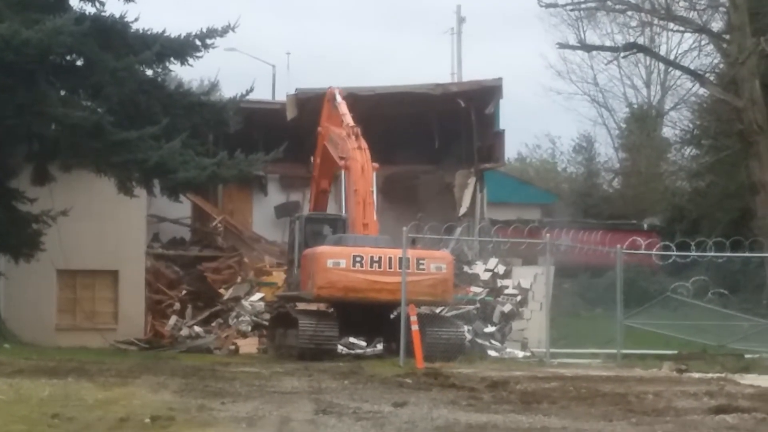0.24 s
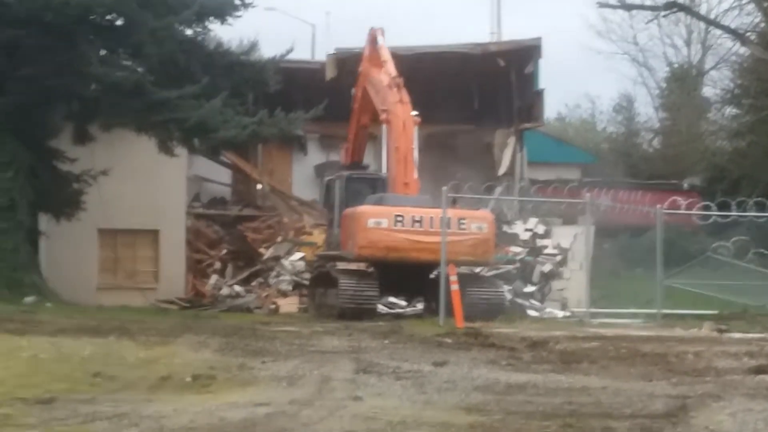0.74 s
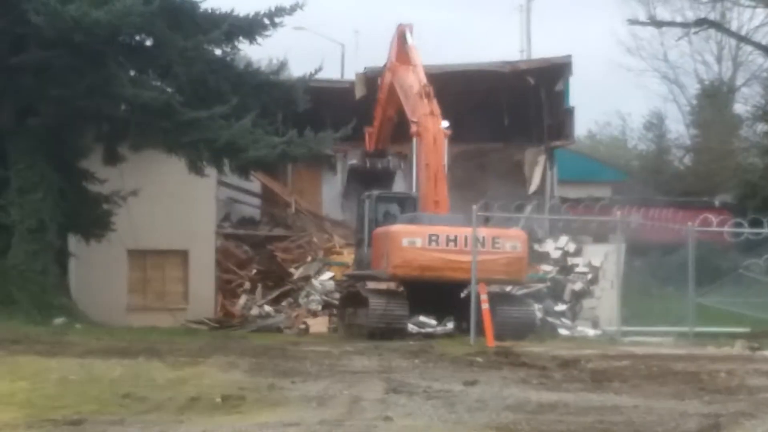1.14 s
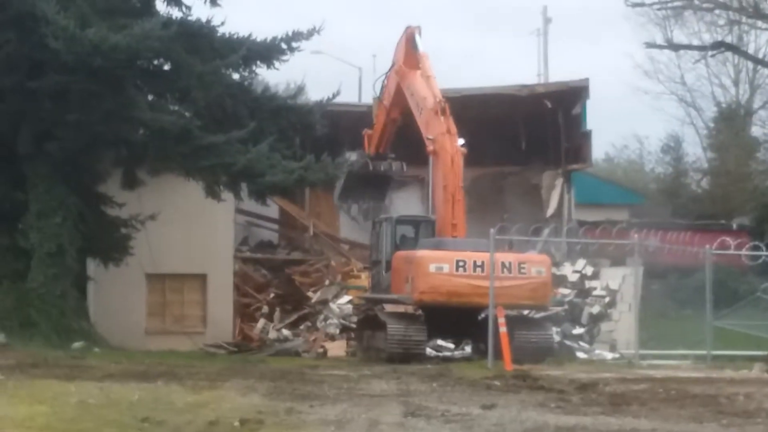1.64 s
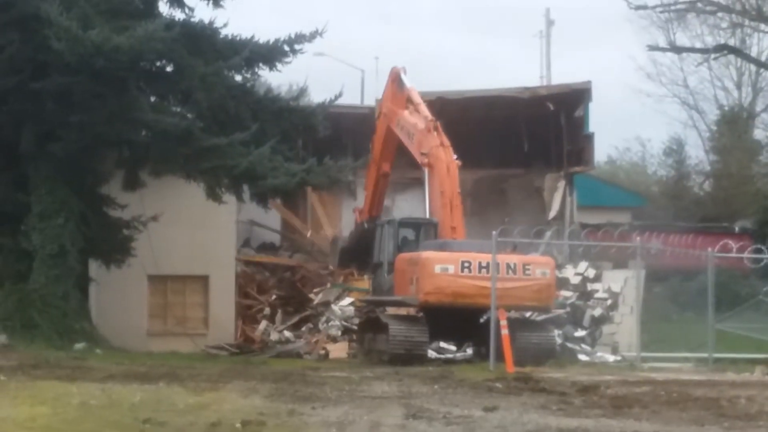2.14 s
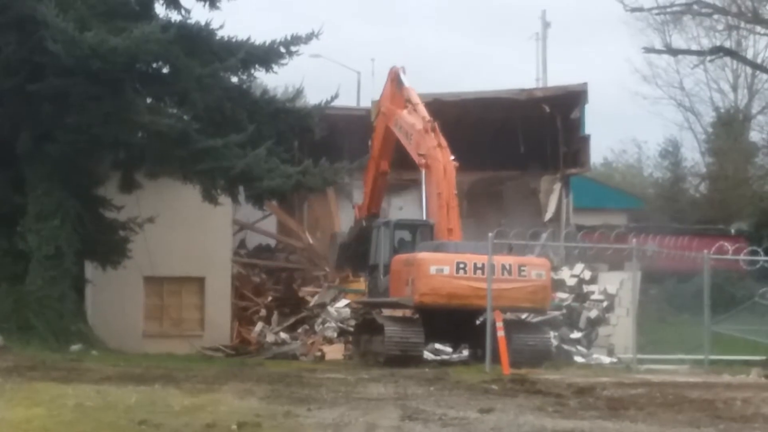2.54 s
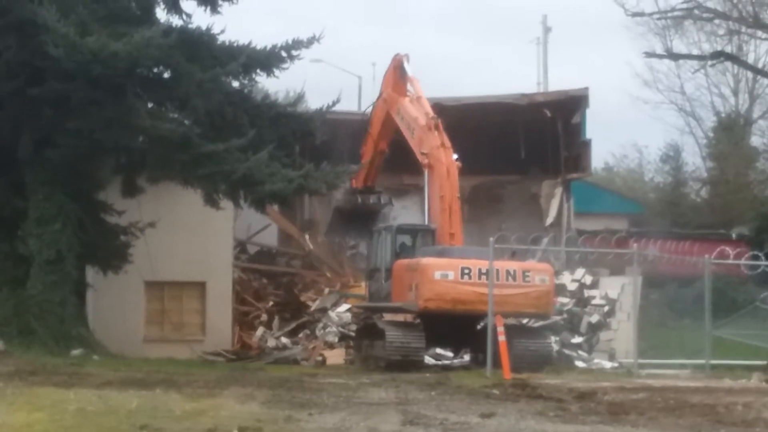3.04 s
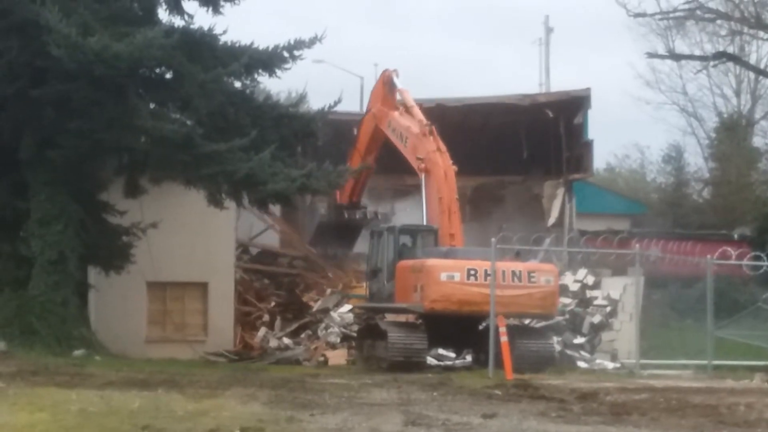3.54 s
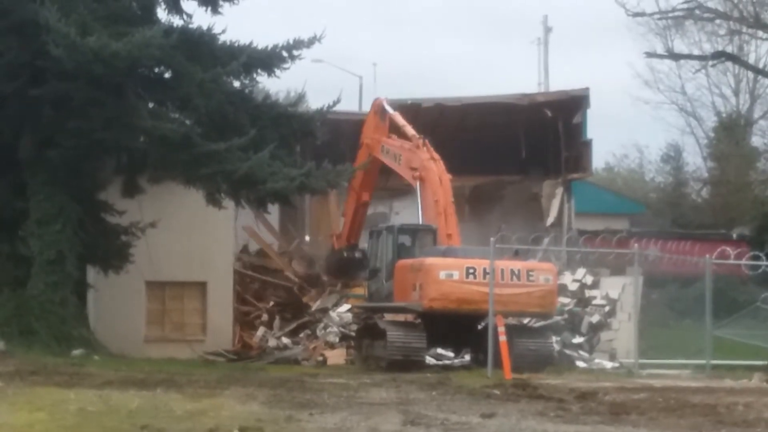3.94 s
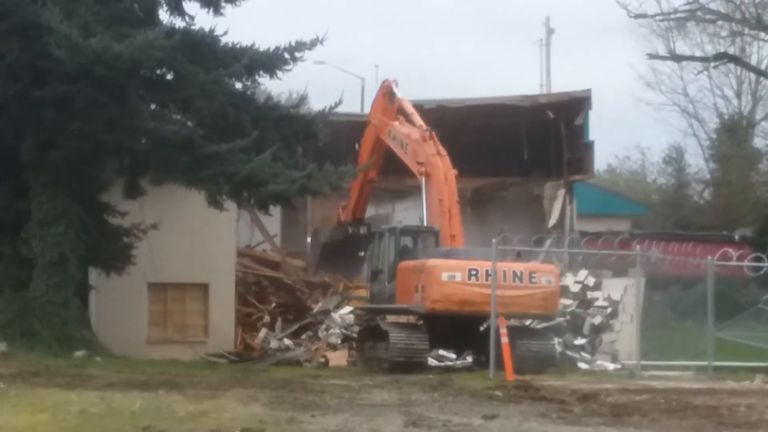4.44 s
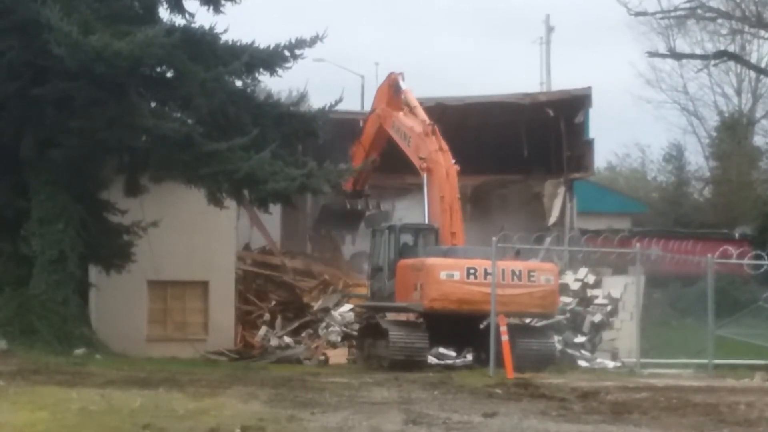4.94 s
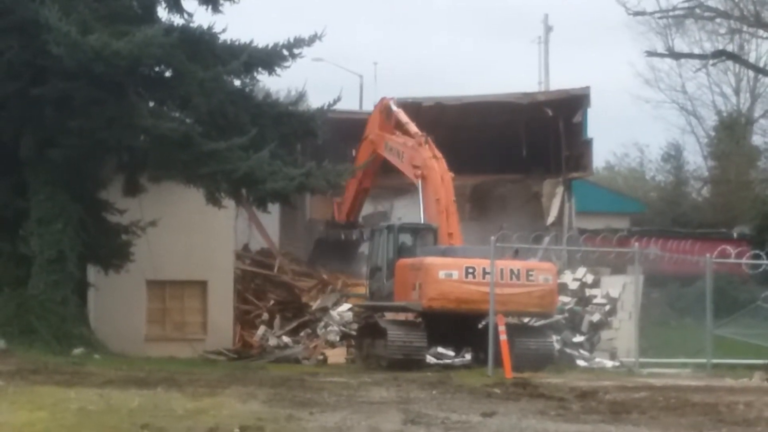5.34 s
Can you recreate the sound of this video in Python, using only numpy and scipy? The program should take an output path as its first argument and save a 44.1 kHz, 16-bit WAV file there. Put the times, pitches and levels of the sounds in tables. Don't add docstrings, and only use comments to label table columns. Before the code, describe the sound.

Demolition across a yard: sliding broken boards, a quiet engine lull, then two big splintering wood crashes and a final one cut short.

```python
import sys
import numpy as np
from scipy import signal
from scipy.fft import rfft, irfft, next_fast_len
from scipy.io import wavfile
from scipy.ndimage import uniform_filter1d, map_coordinates

SR = 44100
rng = np.random.default_rng(int(sys.argv[2]) if len(sys.argv) > 2 else 0)


def invert_db(level):
    return 10 ** (np.asarray(level, dtype=float) / 20)


def dump_mix(stems):
    frames = np.atleast_2d(stems).T
    limited = np.clip(frames, -1, 1)
    pcm = np.round(limited * 32767).astype(np.int16)
    wavfile.write(sys.argv[1], SR, pcm)


N = 246959

# (time [s], level [dB], build-up [s], hold [s], fade [s])
HEAP_SLIDES = [(0, -14.5, .01, 0.014, 0.25), (.4, -33, 0.095, .02, 1.05), (1.3, -33, 0.38, 0.88, 0.53),
               (1.73, -21, 0.051, 0.053, 0.068), (2.01, -12, 0.016, 0.0052, 0.063),
               (2.045, -9, .01, .01, .04), (2.075, -7.5, 0.025, 0.11, 0.21),
               (2.31, -16, 0.21, 0.0047, 0.067), (2.38, -51, 0.065, .05, .2),
               (2.56, -27.5, 0.24, 0.17, 0.52), (2.95, -36.5, 0.52, 0.22, 0.071),
               (3.41, -27.5, 0.26, 0.024, 0.13), (3.74, -14.5, 0.33, 0.0086, 0.056),
               (3.835, -12, 0.086, 0.25, 0.16), (3.79, -18, 0.11, 0.017, .1),
               (4.25, -27.5, 0.036, 0.28, 2.4), (5.13, -22.5, 0.17, 0.06, 0.32),
               (5.19, -20.5, 0.045, 0.025, 0.097), (2.472, -27, 0.011, 0.036, 0.44),
               (5.54, -11, 0.36, 0.025, 0.28)]
# (time [s], level [dB], build-up [s], hold [s], fade [s])
FIBRE_TEARS = [
    (0, -18.5, .01, 0.0035, 0.21),
    (1.79, -39, 0.059, 0.11, 0.17),
    (2.05, -29.5, 0.072, 0.034, .03),
    (2.073, -19.5, 0.0036, 0.15, 0.26),
    (2.3, -31.5, 0.13, 0.051, 0.27),
    (3.75, -50, 0.66, .02, 0.23),
    (3.835, -19.5, 0.1, 0.13, 0.34),
    (5.42, -31, 0.15, .02, 0.37),
    (5.55, -26, 0.13, 0.0034, 0.13),
]
# (frequency [Hz], gain [dB])
FAR_YARD = [(7500, 0), (8500, -13.5), (10000, -14), (12000, -12.5), (15000, -17)]


def unit(x):
    return x / np.sqrt(np.mean(x ** 2) + 1e-20)


def along(points, hz):
    f, v = np.transpose(points)
    return np.interp(np.log(hz + 1), np.log(f + 1), v)


def curves(rows):
    s, *cols = np.transpose(rows)
    return [np.interp(np.arange(N) / SR, s, c) for c in cols]


def wobble(rate):
    knots = rng.standard_normal(int(N * 200 / SR) + 4)
    return map_coordinates(knots, [np.arange(N) * rate / SR])


def filtered(x, spectrum):
    m = next_fast_len(N + 8192)
    gain = invert_db(along(spectrum, np.fft.rfftfreq(m, 1 / SR)))
    return irfft(rfft(x, m) * gain, m)[:N]


def coloured(x, spectrum):
    return unit(filtered(x, spectrum))


def power_sum(*levels_db):
    power = sum(10 ** (np.asarray(db) / 10) for db in levels_db)
    return 10 * np.log10(power + 1e-14)


def swells(rows):
    step_db = 20
    t = np.arange(N) / SR

    def slope(s, span):
        return step_db * np.clip(s, 0, None) / max(span, 1e-3)

    return power_sum(*(db - slope(s - t, build) - slope(t - s - hold, fade)
                       for s, db, build, hold, fade in rows))


def contacts(count, spread_db, life, wash):
    when, size = rng.random((count, 2)).T
    strength = np.bincount((when * N).astype(int), invert_db(-spread_db * np.log(size + .01)), N)
    envelope = signal.lfilter([1], [1, -np.exp(-1 / (life * SR))], strength)
    return (unit(envelope) + wash) * rng.standard_normal(N)


def clatter(count, low_hz, high_hz, cycles, spread_db, size):
    when, pitch, strength = rng.random((count, 3)).T[..., None]
    hz = low_hz + (high_hz - low_hz) * pitch
    k = np.arange(size)
    rings = invert_db(-spread_db * np.log(strength + .03)) * np.sqrt(hz) * np.exp(-k * hz / (cycles * SR))
    rings = rings * np.sin(2 * np.pi * hz * k / SR) * (1 - k / size)
    return np.bincount(((when * N).astype(int) + k).ravel(), rings.ravel(), N + size)[:N]


def burst(hz, width_hz, t60, size=SR // 4):
    t = np.arange(size) / SR
    b, a = signal.iirpeak(hz, hz / width_hz, SR)
    noise = rng.standard_normal(size) * invert_db(-60 * t / t60)
    out = signal.lfilter(b, a, signal.lfilter(b, a, noise))
    return out / np.abs(out).max()


def ring(hz, t60, rough, width_hz, size=SR // 4):
    t = np.arange(size) / SR
    tone = invert_db(-60 * t / t60) * np.sin(2 * np.pi * hz * t)
    return (1 - np.exp(-t * hz / 1.6)) * (tone + rough * burst(hz, width_hz, 1.3 * t60))


def onset(rise_s, size=SR // 4):
    return 1 - np.exp(-np.arange(size) / SR / rise_s)


def add(track, s, sound):
    part = track[round(s * SR):][:len(sound)]
    part += sound[:len(part)]


def engine():
    # (time [s], load as exhaust hum [dB])
    load = [(0, -29), (.3, -33), (1.05, -32), (1.15, -25), (1.35, -23.5), (1.5, -26.5), (1.68, -22.5),
            (1.8, -28.5), (2.1, -29), (2.5, -29), (2.9, -26.5), (3.35, -26), (4.3, -24), (4.75, -25),
            (5.05, -27), (5.6, -22)]
    # (time [s], level [dB])
    spool = [(0, -56), (1.05, -56), (1.15, -49.5), (1.5, -51), (2.5, -57.5), (5.6, -52)]
    # (crankshaft order [-], level [dB], phase unrest [rad])
    orders = [(2, -10.5, 2.5), (3, -13.5, 0.47), (4, -7.5, 0.75), (5, 3, 0.44), (6, -4.5, 0.61),
              (7, -15, 1), (9, -48, .4)]
    # (frequency [Hz], density [dB per Hz])
    block_spectrum = [(120, -13.5), (230, -2), (323, -13.5), (400, -10), (541, -15), (700, -13),
                      (1000, -15.5), (1500, -13), (1950, -17), (2300, -20), (3000, -22), (3600, -23),
                      (4100, -34.5), (5700, -33.5), (9000, -120)]
    # (frequency [Hz], density [dB per Hz])
    turbo_spectrum = [(3000, -25), (4200, -34), (5700, 1.5), (6400, 1), (7100, 4), (7700, -1.5),
                      (8500, -20), (10000, -22), (12000, -16), (15500, -30)]
    shaft_hz = 35.1
    load_db, = curves(load)
    hiss_db, = curves(spool)
    turn = 2 * np.pi * shaft_hz * np.arange(N) / SR + .06 * wobble(2)
    hum = np.zeros(N)
    for k, db, unrest in orders:
        level = invert_db(db + (1 + 1.6 * unrest) * wobble(7))
        hum += level * np.cos(k * turn + unrest * wobble(5))
    firing = 1 + 0.11 * np.cos(3 * turn)
    block = coloured(firing * contacts(count=5000, spread_db=2.5, life=0.01, wash=2.4), block_spectrum)
    hiss = coloured(firing * rng.standard_normal(N), turbo_spectrum)
    clatter_db = -32 + 0.94 * (load_db + 27)
    return invert_db(load_db) * hum + invert_db(clatter_db) * block + invert_db(hiss_db - 2.5) * hiss


def plank_level():
    planks_db, planks_top_db = 2.5, -13.5
    yield_db_per_db = .6
    ripping_db = np.clip(swells(FIBRE_TEARS) + 34, 0, None)
    held_db = -power_sum(-swells(HEAP_SLIDES) - planks_db, -planks_top_db)
    return held_db - yield_db_per_db * ripping_db


def ground():
    # (time [s], effort [dB])
    drag = [(0, -28), (.2, -32), (.85, -34), (1.06, -46), (1.23, -31.5), (1.6, -27), (1.8, -19.5),
            (2.05, -24.5), (2.2, -22.5), (2.8, -29.5), (3.4, -26), (3.7, -22), (4.5, -22.5), (5, -23.5),
            (5.4, -17), (5.47, -11), (5.53, -15), (5.6, -14.5)]
    # (frequency [Hz], density [dB per Hz])
    earth_spectrum = [(24, -49), (40, -18), (57, -11), (72, -6.5), (90, -7), (139, -1), (175, -4.5),
                      (230, -37), (390, -120)]
    # (frequency [Hz], density [dB per Hz])
    beam_spectrum = [(110, -35), (180, -3), (270, -13), (370, -16), (520, -35), (880, -120)]
    # (time [s], peak level [dB], ring [Hz], t60 [s])
    thuds = [(0.032, -9, 204, 0.067), (0.17, -14, 176, 0.11), (1.721, -10, 134, 0.08),
             (1.735, -7.5, 142.6, 0.2), (1.826, -8, 168.3, 0.23), (2.044, -3, 188, 0.075),
             (2.279, -12, 162, 0.054), (2.561, -8, 173.4, 0.19), (3.623, 3.5, 173, 0.052),
             (3.671, -4.5, 163, 0.088), (3.986, -14, 171, 0.17), (4.536, -4, 177, 0.18),
             (4.657, -3, 173.6, 0.14), (4.717, -9, 162.6, 0.41), (5.007, -12, 194, 0.17),
             (5.141, -3, 147, 0.15), (5.27, -6.5, 139.5, 0.27), (5.34, -13, 148, 0.32),
             (5.382, -22, 157, 0.07), (5.463, 5, 145, 0.073), (5.568, -1.5, 119.3, 0.17)]
    beam_ring_db, heap_shakes_db = -5, -6.5
    effort_db, = curves(drag)
    lumps = .8 * wobble(16)
    out = invert_db(effort_db - 1.5 + lumps) * coloured(rng.standard_normal(N), earth_spectrum)
    beams_db = power_sum(effort_db + beam_ring_db, plank_level() + heap_shakes_db)
    out += invert_db(beams_db + 1.4 * lumps) * coloured(rng.standard_normal(N), beam_spectrum)
    t = np.arange(SR // 3) / SR
    for s, db, hz, t60 in thuds:
        decay = invert_db(db - 1.5 - 60 * t / t60)
        add(out, s, decay * onset(0.0046, SR // 3) * np.sin(2 * np.pi * hz * t))
    return out


def debris():
    # (frequency [Hz], density [dB per Hz])
    slat_spectrum = [(800, -18), (1050, -11.5), (1380, 3.5), (1630, -1.5), (1890, 3.5), (2300, -2.5),
                     (2700, -11), (3300, -42.5), (3900, -34), (5000, -75), (8000, -120)]
    # (frequency [Hz], density [dB per Hz])
    plank_spectrum = [(200, -59), (350, -38.5), (430, -19), (520, -6.5), (634, -6), (746, -9.5),
                      (900, -7.5), (1150, -11.5), (1500, -15), (2500, -120)]
    # (frequency [Hz], density [dB per Hz])
    splinter_spectrum = [(1650, 5.5), (2800, 6.5), (3390, 2), (4720, -2.5), (5860, -7), (7510, -17),
                         (8280, -48), (9000, -31.5), (11700, -54), (19800, -120)]
    # (frequency [Hz], density [dB per Hz])
    dust_spectrum = [(4710, -10.5), (8000, -3), (8870, -15), (11800, -9.5), (12900, -15.5), (14000, -11),
                     (15600, -19)]
    heap_db, tear_db = swells(HEAP_SLIDES), swells(FIBRE_TEARS)
    crumbs_db = -44 + 0.63 * (heap_db + 30.5)
    splinter_db = power_sum(tear_db, crumbs_db)
    dust_db = -52 + 1.4 * (splinter_db + 21)
    tumble = wobble(28)
    heavy = np.clip((heap_db + 41) / 22, 0, .7)

    def mixed(rings, body):
        wash = coloured(rng.standard_normal(N), body)
        return heavy * coloured(rings, body) + np.sqrt(1 - heavy ** 2) * wash

    slats = clatter(count=5000, low_hz=912, high_hz=3330, cycles=4.0, spread_db=2.5, size=600)
    planks = clatter(count=1400, low_hz=401, high_hz=1367, cycles=4.2, spread_db=3.5, size=1400)
    crackle = contacts(count=3500, spread_db=8.5, life=0.0065, wash=3.0)
    out = invert_db(heap_db - 5 + 1.7 * tumble) * mixed(slats, slat_spectrum)
    out += invert_db(plank_level() - 4 + 0.13 * tumble) * mixed(planks, plank_spectrum)
    out += invert_db(splinter_db + 2.5 + 0.39 * tumble) * coloured(crackle, splinter_spectrum)
    return out + invert_db(dust_db + 10.5 + 0.62 * tumble) * coloured(crackle, dust_spectrum)


def thin_boards():
    # (time [s], peak level [dB], ring [Hz], t60 [s])
    landings = [(.003, -3.5, 1785, 0.073), (.012, -3.5, 2360, 0.034), (.03, -5.5, 1500, 0.043),
                (.052, -11, 2070, 0.061), (0.083, -10, 1450, 0.045), (0.105, -7, 1825, 0.046),
                (0.125, -16, 1610, 0.064), (1.737, -8.5, 1813, 0.18), (2.15, -17, 1670, 0.055),
                (2.183, -12, 1940, .06), (2.241, -3.5, 1930, 0.063), (2.317, 0, 1324, 0.067),
                (2.473, -7.5, 1910, 0.019), (3.6, -11, 2004, 0.091), (3.833, -16, 1880, .08),
                (3.905, -3.5, 1450, 0.068), (3.965, -3, 1850, 0.067), (5.547, -5.5, 1920, 0.051),
                (0.168, -11, 1960, 0.029), (0.418, -26, 1880, 0.14), (1.597, -18, 2270, 0.088),
                (1.698, -16, 1140, 0.062), (1.727, -1.5, 1287, 0.056), (1.762, -11, 1690, 0.1),
                (1.799, -20, 1730, 0.065), (1.829, -41.5, 1530, 0.058), (2.011, -20, 1770, .09),
                (2.041, -4, 1320, 0.11), (2.089, -5, 1860, 0.16), (2.124, -10, 1880, 0.2),
                (2.287, -7, 1774, 0.17), (2.474, -9.5, 1300, 0.021), (2.524, -8.5, 1440, 0.057),
                (3.108, -16, 1290, 0.06), (3.333, -16, 2340, 0.03), (3.568, -14, 1430, 0.073),
                (3.677, -7, 1334, 0.13), (3.73, -4, 1330, 0.05), (3.86, -7, 1850, 0.1),
                (4.052, 0, 1994, 0.037), (4.445, -8, 1830, 0.021), (4.79, -22, 2180, 0.049),
                (5.112, -12, 1750, 0.14), (5.193, -7, 1100, 0.16), (5.31, -16, 1450, 0.067),
                (5.361, -9, 1150, 0.083), (5.425, -2, 1810, 0.08), (5.495, -10, 1890, 0.29)]
    out = np.zeros(N)
    for s, db, hz, t60 in landings:
        board = invert_db(-8.5) * ring(hz, 1.05 * t60, rough=1.62, width_hz=380)
        slap = 0.57 * burst(1510, width_hz=750, t60=0.36 * t60)
        add(out, s, invert_db(db - 3) * (board + slap))
    return out


def thick_boards():
    # (time [s], peak level [dB], ring [Hz], t60 [s])
    landings = [(.004, -11, 680, 0.08), (.026, -9, 790, 0.11), (2.166, -1.5, 830, 0.065),
                (2.21, 0.5, 985, 0.033), (2.239, 3, 625, 0.062), (2.258, -9, 590, 0.061),
                (2.285, -5, 730, 0.035), (2.314, -5, 1040, 0.029), (2.331, 0, 660, 0.032),
                (2.373, -11, 645, 0.056), (3.596, -12, 806, 0.095), (3.628, -17.5, 790, 0.063),
                (3.686, -10.5, 950, 0.15), (3.775, -11, 960, 0.19), (3.811, -9.5, 1002, 0.14),
                (3.842, -11, 607, 0.091), (3.986, -2, 540, 0.04), (4.036, -2.5, 547, 0.052),
                (4.101, -16, 580, 0.091), (4.155, -16, 974, .06), (.419, -24, 888, 0.15),
                (1.759, -10.5, 986, 0.12), (1.785, -10, 865, .06), (1.808, -6, 620, 0.13),
                (1.829, -21, 570, 0.043), (2.014, -6, 1150, 0.077), (2.34, -5, 620, 0.066),
                (2.58, -19.5, 376, 0.15), (3.95, -18.5, 576, 0.36), (5.38, -6, 314, 0.1),
                (2.634, -15, 908, 0.11), (3.11, -16.5, 860, 0.061), (3.362, -12, 797, 0.071),
                (3.512, -6, 864, 0.06), (3.677, -9, 480, 0.072), (3.739, -6, 558, 0.14),
                (4.056, -5, 535, 0.057), (4.349, -15, 670, 0.064), (4.445, -10, 630, 0.034),
                (5.188, -25, 905, 0.16), (5.314, -15, 620, 0.062), (5.495, -12, 977, 0.22)]
    out = np.zeros(N)
    for s, db, hz, t60 in landings:
        add(out, s, invert_db(db - 7.5) * onset(0.0049) * ring(hz, t60, rough=1.5, width_hz=304))
    return out


def snaps():
    # (time [s], peak level [dB], centre [Hz], t60 [s])
    cracks = [(.016, -8.5, 3200, .05), (.079, -21.5, 7100, 0.12), (.118, -24.5, 7100, 0.15),
              (.164, -27, 6900, .08), (2.106, -4, 5500, .08), (3.6076, -18, 2880, 0.098),
              (3.645, -19.5, 2650, 0.054), (3.6765, -16.5, 2600, 0.086), (3.6914, -22.5, 3500, .06),
              (3.7338, -20, 2670, .05), (3.86, -8, 2600, 0.052), (3.92, -9, 4000, .08),
              (4.101, -15, 4500, .08), (2.004, -13, 3860, 0.032), (2.05, -19.5, 4260, 0.06),
              (2.0713, -7.5, 4800, 0.075), (2.119, -6, 4300, 0.16), (2.176, -6, 5600, 0.05),
              (2.2046, -5.5, 3950, 0.056), (2.2465, -9, 4530, 0.11), (2.2988, -20.5, 3960, 0.25),
              (2.476, -14.5, 1920, 0.012), (2.476, -25.5, 4190, 0.061), (2.527, -21, 3650, 0.055),
              (2.957, -25, 4350, 0.18), (2.991, -23, 3750, 0.05), (3.5836, -22.5, 3620, 0.05),
              (3.767, -13, 4400, 0.046), (3.797, -25, 4770, 0.038), (3.83, -23.5, 5030, 0.05),
              (4.0506, -13, 3900, 0.17), (4.57, -17.5, 2850, 0.05), (5.191, -34, 4060, 0.05),
              (5.3153, -32, 4660, 0.061), (5.336, -22, 4570, 0.036), (5.42, -18.5, 4260, 0.046),
              (5.4956, -32, 3900, 0.05), (5.553, -8.5, 4320, 0.077)]
    out = np.zeros(N)
    for s, db, hz, t60 in cracks:
        brightness = np.clip((db + 24.5) / 25, .1, 1)
        edge = brightness * burst(8800, width_hz=12000, t60=1.3 * t60)
        add(out, s, invert_db(db - 4.5) * onset(0.00072) * (burst(hz, 1900, t60) + edge))
    return out


def grit():
    # (time [s], level [dB], build-up [s], hold [s], fade [s])
    puffs = [
        (.01, -58, .01, .02, 0.23),
        (1.6, -71.5, 0.46, 0.22, .05),
        (1.812, -56.5, .006, 0.088, .012),
        (1.91, -72, .01, .08, .02),
        (2.96, -72, .012, .036, .035),
        (4.578, -65.5, .012, 0.022, .035),
        (3.68, -68, .02, .03, .05),
        (5.42, -68, .04, .02, .06),
    ]
    # (frequency [Hz], density [dB per Hz])
    grit_spectrum = [(6000, -41), (8500, -14.5), (11500, -4), (15500, -8), (17000, -120)]
    grains = contacts(count=3000, spread_db=3, life=.003, wash=4)
    return invert_db(swells(puffs) + 5.5 + .8 * wobble(40)) * coloured(grains, grit_spectrum)


def strikes():
    # (time [s], peak level [dB], centre [Hz], t60 [s])
    knocks = [(0.0514, -14, 1820, 0.033), (0.0918, -10, 1920, 0.04), (0.168, -9, 1970, 0.044),
              (2.038, -6, 1330, 0.04), (2.071, -5, 1850, 0.037), (2.0938, -7, 1840, 0.04),
              (2.1303, 1, 1970, 0.04), (2.1394, -3, 2220, 0.043), (2.191, -7, 1930, 0.034),
              (2.202, -5, 1920, 0.04), (2.2694, -13, 1670, 0.04), (2.2922, 2, 1430, 0.054),
              (2.3094, -3, 1340, 0.04), (3.7966, -8, 1900, 0.033), (3.8448, 0, 1930, 0.051),
              (3.8655, -6, 2200, 0.036), (3.8836, 1, 1780, 0.055), (3.9085, 3, 1380, 0.046),
              (3.9303, 1, 1580, 0.04), (3.9462, 1, 1720, 0.045), (3.9599, -6, 1670, 0.04),
              (3.9783, -15, 2170, 0.04), (3.9996, -8, 1810, 0.04), (4.0294, -8, 1910, 0.04),
              (4.0517, 0, 1920, 0.056), (4.0744, -7, 1410, 0.04), (4.1094, -14, 1490, 0.04),
              (5.1284, -17, 1500, 0.04), (5.179, -16, 1090, 0.04), (5.1896, -7, 1470, 0.032),
              (5.2144, -17, 1120, 0.036), (5.251, -17, 1130, 0.04), (5.3365, -4.5, 1490, 0.04),
              (5.3894, -6, 1530, 0.047), (5.4953, -2, 1800, 0.04), (5.5182, -4, 1860, 0.04),
              (5.5314, -4, 1910, 0.036), (5.5744, -11, 1530, 0.044)]
    # (time [s], peak level [dB], centre [Hz], t60 [s])
    more_knocks = [
        (2.1684, -3, 4570, 0.043),
        (3.852, -5, 2320, .07),
        (3.895, -2, 2300, 0.078),
        (3.936, -3, 2330, .07),
        (3.968, -6, 2200, .07),
        (4.054, 0.5, 2050, .03),
        (5.195, -9.5, 2100, .05),
        (1.745, -10, 480, 0.12),
        (2.333, -5, 640, 0.046),
    ]
    out = np.zeros(N)
    for s, db, hz, t60 in knocks + more_knocks:
        knock = burst(hz, .5 * hz, t60, size=SR // 8)
        edge = 0.083 * burst(3400, width_hz=2400, t60=0.34 * t60, size=SR // 8)
        add(out, s, invert_db(db - 6.5) * (knock + edge))
    return filtered(out, FAR_YARD)


def ticks():
    # (time [s], peak level [dB], centre [Hz], left minus right [dB])
    near_clicks = [(.374, -52.5, 14000, -8), (0.71, -50, 11000, 3), (.7155, -46, 12000, 0),
                   (0.88, -55, 9100, -9), (1.0283, -34, 9000, 1), (1.034, -23.5, 6300, 4),
                   (1.1915, -45, 11500, 4), (1.2044, -53, 13500, -2), (1.3668, -26, 6900, 5.5),
                   (.082, -43, 11900, -6), (.166, -36, 10000, -1), (.329, -57, 13000, -1.5),
                   (1.63, -51, 12000, -1.5), (1.665, -46, 12000, -4), (1.989, -50.5, 13900, -0.5)]
    out = np.zeros((2, N))
    for s, db, hz, pan_db in near_clicks:
        click = burst(hz, 0.45 * hz, 0.0025, size=900)
        click = click + .25 * burst(12000, width_hz=8200, t60=.003, size=900)
        click = click + 1.3 * burst(0.44 * hz, 0.21 * hz, .004, size=900)
        add(out[0], s, invert_db(db + pan_db / 2) * click)
        add(out[1], s, invert_db(db - pan_db / 2) * click)
    return np.array([filtered(port, [(2000, -23), (4200, 0.5)]) for port in out])


def scattered(x):
    # (frequency [Hz], t60 [s])
    wall_decays = [(200, 0.53), (2000, 1), (10000, 0.044)]
    hz, t, z = signal.stft(rng.standard_normal(SR // 2), SR, nperseg=256)
    decay = invert_db(-60 * t / along(wall_decays, hz)[:, None])
    tail = signal.istft(z * decay, SR, nperseg=256)[1]
    return signal.fftconvolve(x, tail / np.linalg.norm(tail))[:N]


def ports(mid):
    # (frequency [Hz], side minus mid [dB])
    side_levels = [(60, -42.5), (200, -50), (380, -25.5), (700, -16), (1290, -14), (2380, -16.5),
                   (4400, -13.5), (7400, -16), (8600, -26), (15000, -22.5)]
    # (frequency [Hz], left minus right [dB])
    balance = [(700, 0), (1290, -1.4), (2380, -1.1), (4400, 0)]
    hz, _, z = signal.stft(mid, SR, nperseg=512)

    def field(bins, frames):
        noise = uniform_filter1d(rng.standard_normal(z.shape), bins, 0)
        return unit(uniform_filter1d(noise, frames, 1))

    lean = np.tanh(along(balance, hz) * np.log(10) / 40)
    level = invert_db(along(side_levels, hz)[:, None] + 3.5 * field(8, 6))
    echo = level * 1j * np.exp(1.1j * field(3, 5))
    side = signal.istft(z * (lean[:, None] + echo), SR, nperseg=512)[1][:N]
    return np.array([mid + side, mid - side])


def scene():
    # (frequency [Hz], gain [dB])
    bass_cut = [(20, -31), (45, -9), (65, 0), (300, -1), (380, -3.5), (480, 0)]
    hits = filtered(thin_boards() + thick_boards() + snaps(), FAR_YARD)
    yard = engine() + ground() + debris() + hits + invert_db(-9) * scattered(hits) + grit() + strikes()
    yard = yard * np.clip(np.arange(N)[::-1] / 130, 0, 1)
    return ports(filtered(yard, bass_cut)) + ticks()


def top_cut(x):
    return signal.sosfilt(signal.butter(12, 15730, fs=SR, output="sos"), x)


def record(dry):
    held = dry / (1 + np.abs(dry) ** 8) ** (1 / 8)
    return top_cut(held)


dry = scene()
out = record(dry)
dump_mix(out)
```